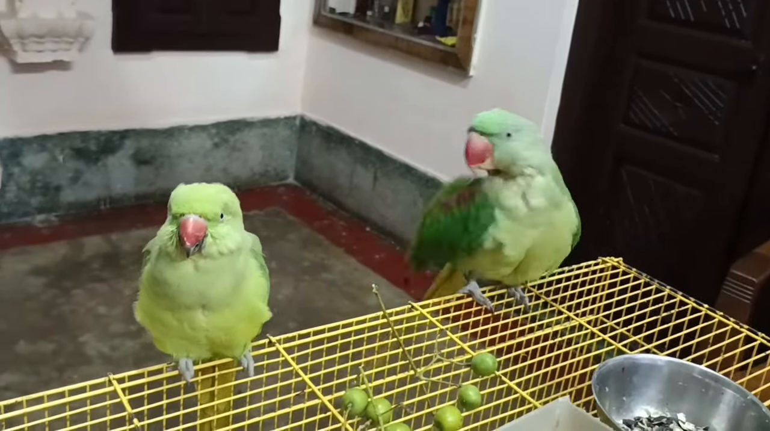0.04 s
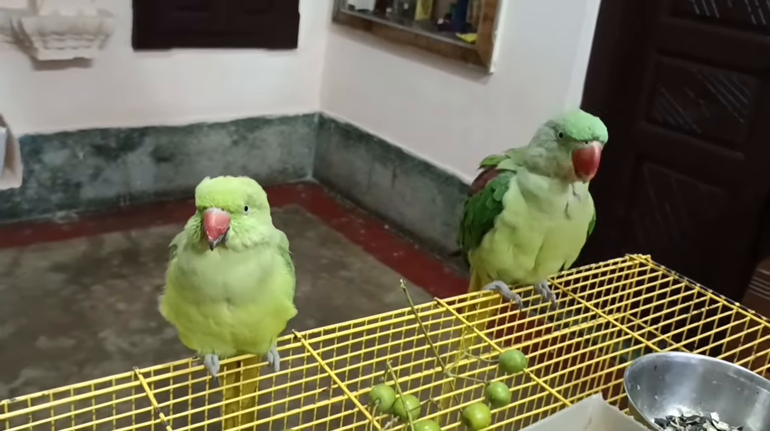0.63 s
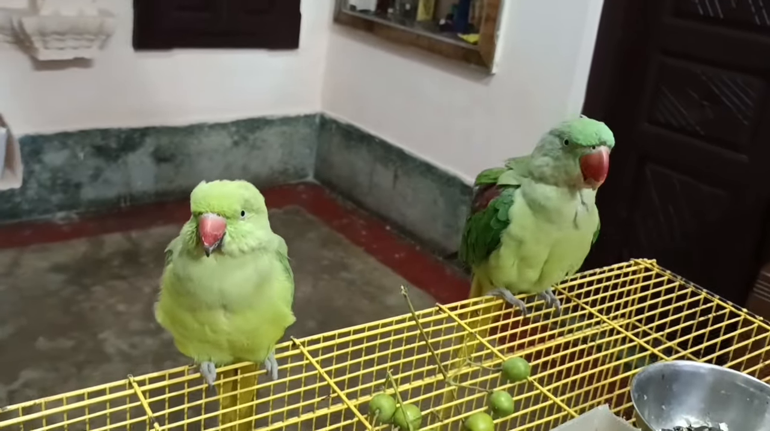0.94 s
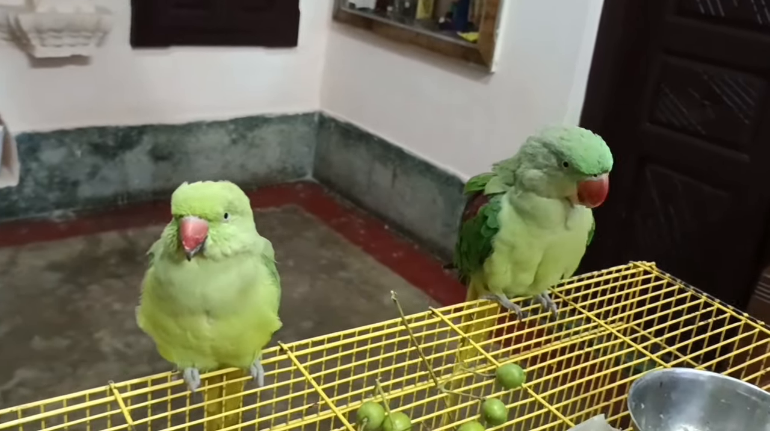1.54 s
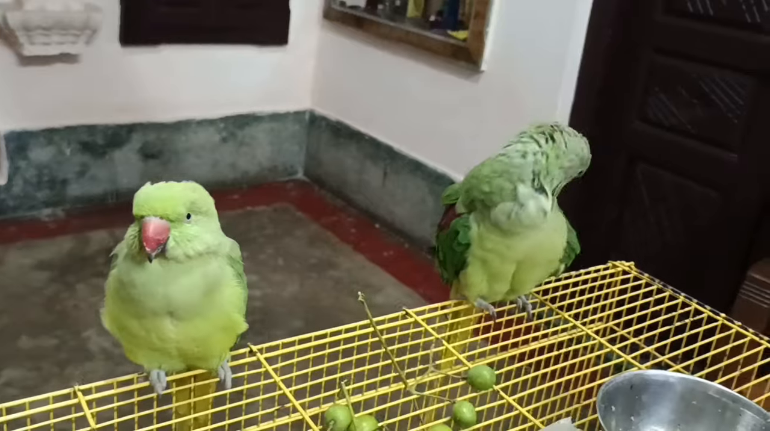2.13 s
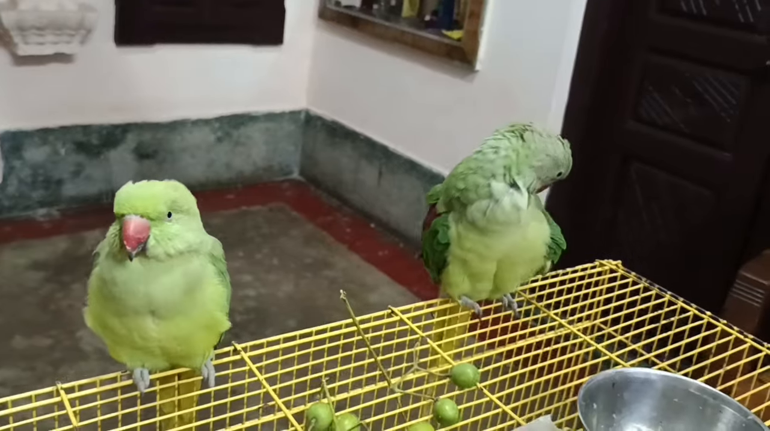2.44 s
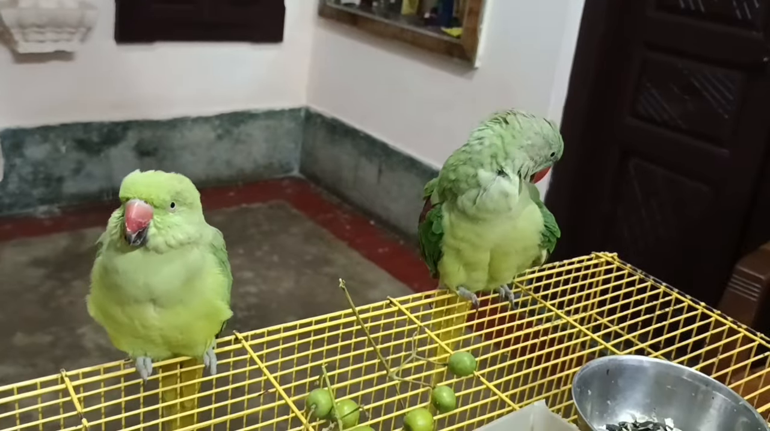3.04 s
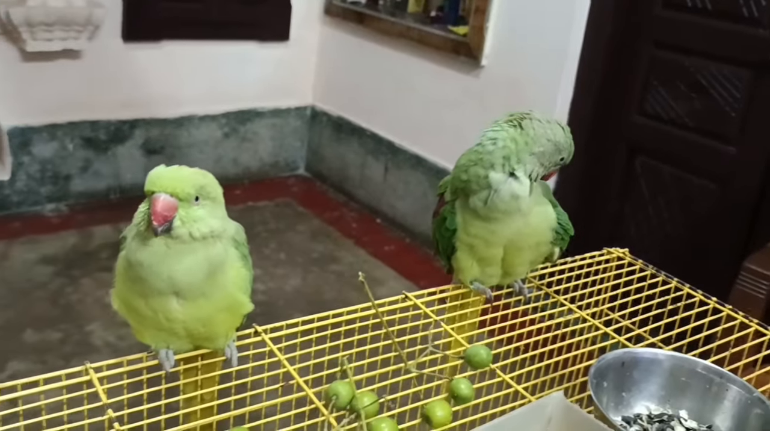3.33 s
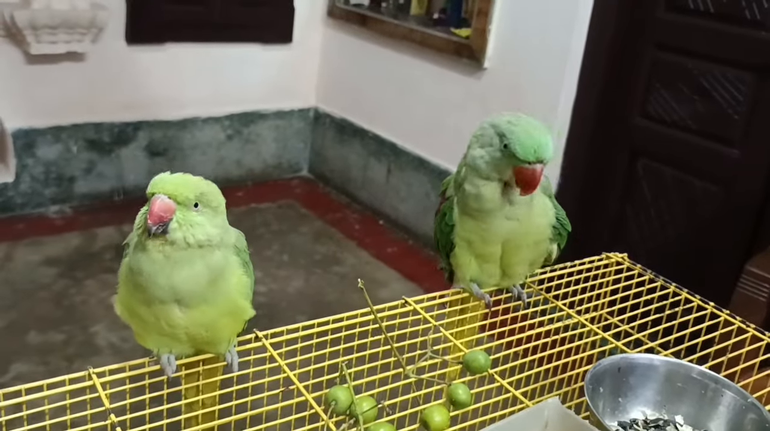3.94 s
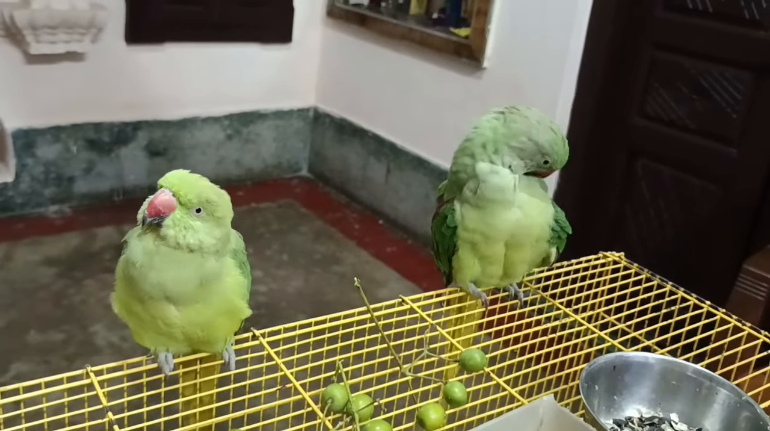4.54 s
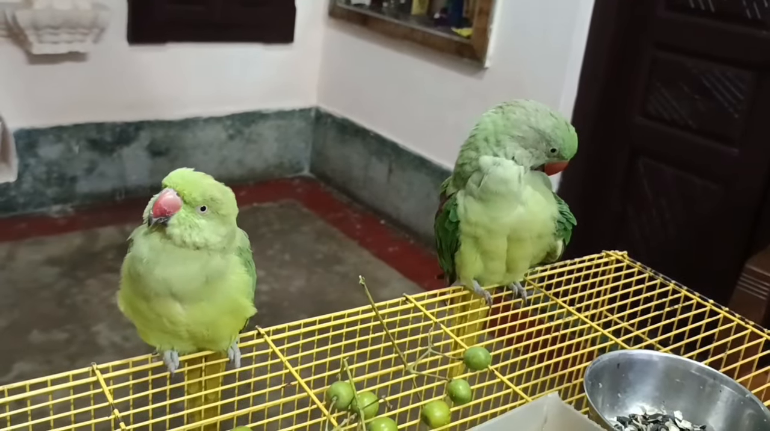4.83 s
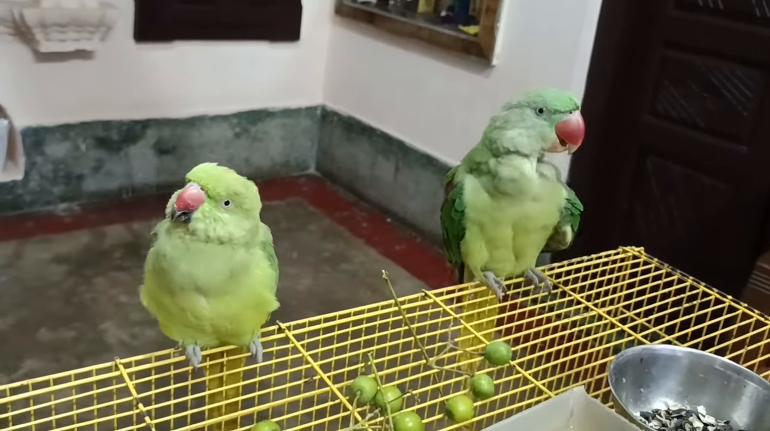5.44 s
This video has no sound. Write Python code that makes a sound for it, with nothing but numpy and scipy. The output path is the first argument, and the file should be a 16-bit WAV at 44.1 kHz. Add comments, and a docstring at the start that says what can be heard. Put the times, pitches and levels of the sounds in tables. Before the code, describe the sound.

Close by in a small, slightly echoing room, a parakeet squeaks once, loudly. Feathers rustle softly over a steady low rumble and hiss. After a brief upward chirp and a few dry beak clicks, the bird runs a hoarse rising chirp, a squawk and a long climbing whistle together, the whistle breaking to a higher note. After a short gap it chirps upward once more.

```python
"""Caged parakeets in a hard-walled room

Two parakeets sit on their wire cage, close to a pair of microphones. One is finishing a high whistle as the
sound begins, then chirps upward, squawks and slides into a long whistle that cracks to a higher note. Each call
is a harmonic stack from the syrinx, swept through the fixed resonances of the throat, plus a rasp of air.
Between calls: faint beak clicks and feather rustles over a low room rumble."""
import sys
import numpy as np
from scipy import signal
from scipy.fft import rfft, irfft
from scipy.io import wavfile

SR = 44100
rng = np.random.default_rng(int(sys.argv[2]) if len(sys.argv) > 2 else 0)


def store_wav(level_fs):
    """Save 16-bit WAV to argv[1]."""
    pcm = np.round(np.clip(np.atleast_2d(level_fs), -1, 1) * 32767)
    wavfile.write(sys.argv[1], SR, pcm.T.astype(np.int16))


N = 250047
BAND_LIMIT_HZ = 15750


def gain_of(db):
    """Decibels to an amplitude factor."""
    return 10 ** (np.asarray(db) / 20)


def unit_rms(x):
    """Scales to an rms of one."""
    return x / np.sqrt(np.mean(x ** 2) + 1e-20)


def log_interp(points, hz):
    """Reads a table on a log-frequency axis."""
    f, value = np.transpose(points)
    return np.interp(np.log(hz + 1), np.log(f + 1), value)


def ramp(x, zero, one):
    """Goes from 0 to 1 between two values of x."""
    return np.clip((x - zero) / (one - zero), 0, 1)


def trace(points):
    """Joins breakpoints with straight lines; returns time, then each column."""
    times, *columns = np.transpose(points)
    t = np.arange(times[0], times[-1], 1 / SR)
    return t, *(np.interp(t, times, column) for column in columns)


def add(mix, start_s, sound):
    """Mixes a sound in at a time."""
    part = mix[max(round(start_s * SR), 0):][:len(sound)]
    part += sound[:len(part)]


def noise(spectrum, size):
    """Coloured noise, rms one."""
    shape = gain_of(log_interp(spectrum, np.fft.rfftfreq(size, 1 / SR)))
    return unit_rms(irfft(rfft(rng.standard_normal(size)) * shape, size))


def flutter(rate_hz, size):
    """Random wavering up to about the given rate, rms one."""
    hz = np.fft.rfftfreq(size, 1 / SR)
    return unit_rms(irfft(rfft(rng.standard_normal(size)) * hz / (1 + (hz / rate_hz) ** 4), size))


# Background stereo image: (frequency [Hz], left-right correlation [-1..1])
AIR_CORRELATION = [(60, 0.92), (130, 0.91), (270, 0.91), (570, 0.59), (1210, -0.11), (2580, -0.075),
                   (5460, -0.01), (11600, -0.099)]
def air(spectrum, level_db):
    """Steady stereo noise, nearly alike on both sides in the bass."""
    hz = np.fft.rfftfreq(N, 1 / SR)
    correlation = log_interp(AIR_CORRELATION, hz)
    shape = gain_of(log_interp(spectrum, hz)) * np.sqrt([1 + correlation, 1 - correlation])
    mid, side = irfft(rfft(rng.standard_normal((2, N))) * shape, N)
    return gain_of(level_db) * np.array([mid + side, mid - side]) / mid.std()


# Background noise spectra: (frequency [Hz], relative density [dB])
RUMBLE_SPECTRUM = [(42, -55), (72, -7), (96, -0.5), (113, -4.5), (156, 0), (247, -8), (291, -3.5),
                   (319, -6), (339, -5), (372, -9), (450, -11), (580, -22), (990, -120)]
HISS_SPECTRUM = [(320, -21), (550, 0), (610, -1.5), (864, -2.5), (1310, -8.5), (1430, -9.5), (1830, -10.5),
                 (2160, -11.5), (3920, -22), (4290, -21.5), (5200, -28), (6560, -25.5), (8170, -32.5),
                 (10300, -26.5), (12000, -34), (15700, -67), (22000, -120)]
FIZZ_SPECTRUM = [(6000, -44), (8500, -30.5), (9700, -12), (10400, -3), (11000, -11), (12000, -20.5),
                 (15500, -16.5)]
def room_tone(sway_db=1.55, sway_hz=4.4, hum_hz=50, hum_db=-67.5):
    """Wavering rumble, broad hiss, faint high fizz and a low hum."""
    rumble = air(RUMBLE_SPECTRUM, level_db=-49) * gain_of(sway_db * flutter(sway_hz, N))
    hiss = air(HISS_SPECTRUM, level_db=-55)
    fizz = air(FIZZ_SPECTRUM, level_db=-74.5)
    hum = gain_of(hum_db) * np.sqrt(2) * np.sin(2 * np.pi * hum_hz * np.arange(N) / SR)
    return rumble + hiss + fizz + hum


# Reflections off nearby walls and floor: (delay [s], left [dB], right [dB])
WALL_ECHOES = [(.0062, -30, -9), (.0135, -14, -12.5), (.0205, -31.5, -12.5), (.0345, -15.5, -43.5)]
# Room decay: (frequency [Hz], T60 [s])
ROOM_DECAY = [(300, 0.66), (1000, 0.47), (2200, 0.43), (4500, 0.43), (7000, .36), (11000, 0.35),
              (16000, .2)]
def reverb(x, tail_db=-10.5, treble_db_per_octave=-0.5, build_s=0.018):
    """A few wall echoes, then a diffuse tail whose treble dies first."""
    taps = rng.choice([-1., 1.], (2, SR)) * (rng.random((2, SR)) < .1)
    hz, t, spectra = signal.stft(taps, SR, nperseg=256)
    tilt_db = treble_db_per_octave * np.log2(np.maximum(hz / 2500, 1))[:, None]
    decay_db = -60 * t / log_interp(ROOM_DECAY, hz)[:, None]
    response = signal.istft(spectra * gain_of(tilt_db + decay_db), SR, nperseg=256)[1][:, :SR]
    response *= 1 - np.exp(-(np.arange(SR) / SR / build_s) ** 2)
    midband_gain = np.sqrt(np.mean(abs(rfft(response)[:, 1000:3000]) ** 2))
    response *= gain_of(tail_db) / midband_gain
    for delay_s, *sides_db in WALL_ECHOES:
        response[[0, 1], int(delay_s * SR) + rng.integers(0, 24, 2)] += gain_of(sides_db)
    return signal.fftconvolve(x[None], response, axes=1)[:, :N]


# Feather movements: (centre [s], half length [s], swish [dB], body [dB])
FEATHER_RUSTLES = [(1.027, 0.05, -65.5, -57), (1.211, 0.038, -74, -70), (1.352, 0.026, -62.5, -50),
                   (1.379, 0.027, -65.5, -59), (1.614, 0.0098, -62.5, -46), (1.636, .03, -62.5, -51),
                   (3.346, 0.066, -66, -54.5), (5.235, 0.092, -70.5, -67)]
# Rustle spectra: (frequency [Hz], relative level [dB])
SWISH_SPECTRUM = [(3000, -24), (5500, -13), (7500, -3), (10500, -13), (15000, -29)]
BODY_SPECTRUM = [(400, -25), (950, 5), (1600, -8), (4000, -25), (8000, -53)]
def feathers():
    """Small movements: a high swish with a dull body."""
    out = np.zeros(N)
    for centre_s, half_s, swish_db, body_db in FEATHER_RUSTLES:
        size = int(2 * half_s * SR)
        swish = gain_of(swish_db) * noise(SWISH_SPECTRUM, size)
        body = gain_of(body_db) * noise(BODY_SPECTRUM, size)
        add(out, centre_s - half_s, np.hanning(size) * (swish + body))
    return out


# Beak clicks: (time [s], level [dB], centre [Hz])
BEAK_CLICKS = [(3.309, -54, 9800), (3.317, -50, 10300), (3.341, -49, 9400), (3.351, -45.5, 6600),
               (3.365, -49, 6100)]
def beak(ring_s=0.0014, spread=0.12, tick_count=10, tick_db=-57, tick_hz=9800):
    """The edges of the beak slip over each other: tiny dry clicks among fainter ticks."""
    out, t = np.zeros(N), np.arange(512) / SR
    envelope = t / ring_s * np.exp(1 - t / ring_s)
    ticks = [(time_s, tick_db, tick_hz) for time_s in rng.uniform(3.29, 3.352, tick_count)]
    # (log-frequency offset [spreads], relative level [dB])
    band = [(-14, -50), (-2, -26), (0.5, -9), (0, 3), (0, -14), (2, -34), (7, -50)]
    for time_s, level_db, centre_hz in BEAK_CLICKS + ticks:
        spectrum = [(centre_hz * np.exp(offset * spread), db) for offset, db in band]
        add(out, time_s - ring_s, gain_of(level_db) * noise(spectrum, len(t)) * envelope)
    return out


# Resonances of windpipe and open beak: (frequency [Hz], gain [dB])
THROAT_RESPONSE = [(600, 0.5), (1000, 0), (1600, 1), (2200, 10), (3000, 2), (3600, -10.5), (4300, -6),
                   (5200, -9), (6800, -4.5), (8400, -15.5), (9600, -5), (11300, 4.5), (12200, -2),
                   (13000, -19.5), (15500, -22)]
# Air rasp in a rough call: (frequency [Hz], relative level [dB])
RASP_SPECTRUM = [(600, -36), (1500, -18), (2200, 0), (2800, -2), (3500, -22), (5500, -38), (8500, -48),
                 (10500, -26), (12000, -33), (13500, -54), (15500, -62)]
def syrinx(t, pitch_hz, effort_db, even_db, bright_db, rough, register, *, jitter, shimmer, rasp_db,
           notch_db, top_db, notch_hz=5800, top_hz=10300, quiver_hz=260, waver=0.0091, waver_hz=45,
           uneven_db=4, edge_s=0.0012):
    """One call on a full-length track: a harmonic stack swept through the throat's fixed resonances."""
    size, rough = len(t), np.clip(rough, 0, 1)
    # Unsteady membranes shake pitch and strength.
    wobble = jitter * rough * flutter(quiver_hz, size)
    wobble += waver * np.sqrt(rough) * flutter(waver_hz, size)
    phase = 2 * np.pi * np.cumsum(pitch_hz * (1 + wobble)) / SR
    shake = np.exp(shimmer * rough * flutter(quiver_hz, size))
    k = np.arange(1, 19)[:, None]
    # A symmetric swing loses even harmonics; a harder closure lifts the upper ones.
    source_db = log_interp(register, k) + even_db * (k % 2 == 0) / np.sqrt(k / 2) + bright_db * (k > 2)
    hoarse_db = uneven_db * np.sqrt(rough * np.log(k)) * np.array([flutter(waver_hz, size) for _ in k])
    # A half-closed beak notches the treble and reweights the top resonance.
    hz = k * pitch_hz
    throat_db = log_interp(THROAT_RESPONSE, hz) + notch_db * np.exp(-((hz - notch_hz) / 1200) ** 2)
    throat_db += top_db * np.exp(-((hz - top_hz) / 1400) ** 2)
    amplitudes = gain_of(source_db + hoarse_db + throat_db) * (hz < BAND_LIMIT_HZ)
    tone = np.sqrt(2) * (amplitudes * np.cos(k * phase)).sum(0)
    puffs = unit_rms(1 + .5 * np.cos(phase))  # air escapes once a cycle
    rasp = gain_of(rasp_db) * rough * noise(RASP_SPECTRUM, size) * puffs
    envelope = gain_of(effort_db) * signal.windows.tukey(size, 2 * edge_s * SR / size)
    out = np.zeros(N)
    add(out, t[0], envelope * (tone * shake + rasp))
    return out


# Syrinx spectrum, chirping: (harmonic [number], level [dB])
CHIRP_REGISTER = [(1, 0), (2, -1), (3, 2), (4, -8.5), (5, -12.5), (6, -16), (7, -43), (8, -29.5),
                  (10, -21.5), (13, -33), (15, -28.5), (18, -42)]
# Rising chirps: (start [s], end [s], steepest point [s], sweep time [s], low [Hz], top [Hz],
# effort [dB], brightness [dB], roughness [0..1], rasp [dB], beak notch [dB], top resonance [dB])
RISING_CHIRPS = [(2.705, 2.776, 2.752, .011, 729, 1107, -32, 2.5, .42, -8, -32, 11),
                 (3.472, 3.689, 3.563, .046, 630.4, 1402, -34.5, -1.5, 0.48, 0.5, 5.5, -0.5),
                 (5.426, 5.658, 5.479, .038, 606.4, 1437, -30.5, 0, 0.36, 2.5, -11, 11)]
def chirps(attack_s=0.039, release_share=0.15, swell_db=8, fade_db=-15.5, dull_db=-27, droop=.05,
           hollow_hz=1330, reedy_hz=1200):
    """Pitch and effort climb an S-curve; hoarse in mid-sweep and at the end, hollow when high."""
    out = np.zeros(N)
    for (start_s, end_s, steepest_s, sweep_s, low_hz, high_hz,
         effort_db, bright_db, rough, rasp_db, notch_db, top_db) in RISING_CHIRPS:
        t = np.arange(start_s, end_s, 1 / SR)
        climb = (1 + np.sin(np.arctan((t - steepest_s) / sweep_s))) / 2
        sweeping = 1 - (2 * climb - 1) ** 2
        pitch_hz = low_hz + (high_hz - low_hz) * climb
        opening = ramp(t - start_s, attack_s, 0)
        closing = ramp(t, end_s - release_share * (end_s - start_s), end_s)
        hollow = (1 + np.tanh((pitch_hz - hollow_hz) / 84)) / 2
        reedy = np.exp(-((pitch_hz - reedy_hz) / 160) ** 2)  # second harmonic takes over
        effort_db += swell_db * (climb - 1) + 1.5 * hollow + fade_db * (opening + closing ** 3)
        even_db = 1.6 - 0.5 * reedy - 22 * hollow * (1 - closing ** 3)
        bright_db += 7.5 * hollow - 6 * reedy - sweeping + dull_db * (opening + closing * hollow)
        rough *= 0.36 * (1 - hollow) + 0.64 * np.sqrt(2 * sweeping * climb) + 0.8 * closing ** 2
        pitch_hz *= 1 - droop * closing ** 4
        out += syrinx(t, pitch_hz, effort_db, even_db, bright_db, rough, CHIRP_REGISTER,
                      jitter=.018, shimmer=.28, rasp_db=rasp_db, notch_db=notch_db, notch_hz=6260,
                      top_db=top_db, waver=0.0032, uneven_db=2.5)
    return out


# Syrinx spectrum, squawking: (harmonic [number], level [dB])
SQUAWK_REGISTER = [(1, 0.5), (2, -3), (3, -2.5), (4, -9.5), (5, -8.5), (6, -14), (7, -15), (9, -23),
                   (11, -24), (14, -7), (18, -30)]
# Squawk contour: (time [s], pitch [Hz], effort [dB])
SQUAWK_CONTOUR = [(3.731, 993, -32.5), (3.747, 1024, -28), (3.757, 1098, -26.5), (3.772, 1109, -28),
                  (3.797, 1033, -25.5), (3.832, 963, -27), (3.852, 962, -40.5), (3.885, 927, -42)]
def squawk(slack_hz=930, taut_hz=1030, even_db=0.4):
    """A pitch arch: bright and clear on top, dull and rough as the tension drops."""
    t, pitch_hz, effort_db = trace(SQUAWK_CONTOUR)
    taut = ramp(pitch_hz, slack_hz, taut_hz)
    bright_db = -17 + 18 * taut
    rough = 0.62 - 0.52 * taut ** 2
    return syrinx(t, pitch_hz, effort_db, even_db, bright_db, rough, SQUAWK_REGISTER,
                  jitter=0.023, shimmer=0.12, rasp_db=-8.5, notch_db=5.5, top_db=-5)


def burst_gesture(start_s, length_s, from_hz, to_hz, effort_db, even_db, bright_db,
                  rough_ends, rough_middle, attack_s, release_s, edge_db=-20):
    """Syrinx controls for a brief note that snaps on, bends in pitch and snaps off."""
    t = np.arange(0, length_s, 1 / SR)
    progress = t / length_s
    edges = ramp(t, attack_s, 0) + ramp(t, length_s - release_s, length_s)
    pitch_hz = from_hz + (to_hz - from_hz) * progress ** 2
    rough = rough_ends + (rough_middle - rough_ends) * np.sin(np.pi * progress)
    return start_s + t, pitch_hz, effort_db + edge_db * edges, even_db, bright_db, rough


# Barks: (start [s], length [s], from [Hz], to [Hz], effort [dB], even harmonics [dB], brightness [dB])
BARK_NOTES = [(3.709, .014, 1066, 995, -29.5, 0, 6.5), (5.656, 0.018, 1400, 1330, -35.5, -4, -3)]
def barks():
    """Short, harsh falling notes, roughest in the middle."""
    out = np.zeros(N)
    for note in BARK_NOTES:
        gesture = burst_gesture(*note, rough_ends=.63, rough_middle=.95, attack_s=.0025, release_s=.0044)
        out += syrinx(*gesture, SQUAWK_REGISTER, jitter=0.039, shimmer=.12, rasp_db=-8,
                      notch_db=-2, top_db=-13)
    return out


# Cracks: (start [s], length [s], from [Hz], to [Hz], effort [dB], even harmonics [dB], brightness [dB])
CRACK_NOTES = [(0.051, .057, 2201, 2277, -22, 0.5, -5.5), (4.361, .043, 2299, 2436, -24.5, 8, -6.5)]
def cracks():
    """The brief higher note that each whistle breaks into."""
    out = np.zeros(N)
    for note in CRACK_NOTES:
        gesture = burst_gesture(*note, rough_ends=.48, rough_middle=.45, attack_s=.0045, release_s=.005)
        out += syrinx(*gesture, WHISTLE_REGISTER, jitter=.026, shimmer=0.032, rasp_db=-39,
                      notch_db=-5, notch_hz=6800, top_db=0.5, quiver_hz=190)
    return out


def whistle_gesture(contour, loose_hz=1040, tight_hz=1420, hollow_hz=1400, shrill_hz=1600,
                    full_hz=1700, held_hz=1950, release_s=0.025):
    """Syrinx controls: clearer and fuller with pitch, shrillest part way up, overtones fading last."""
    t, pitch_hz, effort_db = trace(contour)
    tight = ramp(pitch_hz, loose_hz, tight_hz)
    shrill = np.exp(-((pitch_hz - shrill_hz) / 140) ** 2)
    fade_db = -13 * ramp(t, t[-1] - release_s, t[-1])
    even_db = -11 + 15 * ramp(pitch_hz, hollow_hz, full_hz) + fade_db
    bright_db = -15 + 12 * tight + 11 * shrill + fade_db
    rough = (1 - 0.85 * tight) * (1 - 0.36 * ramp(pitch_hz, full_hz, held_hz) ** 4)
    return t, pitch_hz, effort_db, even_db, bright_db, rough


# Syrinx spectrum, whistling: (harmonic [number], level [dB])
WHISTLE_REGISTER = [(1, -1), (2, -13), (3, -10.5), (4, -21), (5, -21.5), (6, -21), (7, -23), (8, -25.5),
                    (10, -19), (14, -38), (18, -69)]
# Whistle contours: (time [s], pitch [Hz], effort [dB])
HELD_END_CONTOUR = [(0, 1968, -11.5), (.022, 1970, -21), (.046, 1912, -16), (.057, 1987, -26.5)]
SLIDE_CONTOUR = [(3.885, 912, -43.5), (3.96, 1110, -36), (4.04, 1285, -32.5), (4.057, 1402, -28.5),
                 (4.11, 1475, -24), (4.167, 1655, -35), (4.173, 1697, -23), (4.238, 1941, -18.5),
                 (4.295, 1952, -19.5), (4.338, 1949, -20), (4.361, 2062, -32)]
def whistles():
    """The end of a high held whistle, already sounding at the start, and a long whistle that slides up and
    holds."""
    squeak = syrinx(*whistle_gesture(HELD_END_CONTOUR), WHISTLE_REGISTER, jitter=.008, shimmer=0.045,
                    rasp_db=-30.5, notch_db=-7.5, notch_hz=7840, top_db=7, waver=0.0018)
    slide = syrinx(*whistle_gesture(SLIDE_CONTOUR), WHISTLE_REGISTER, jitter=0.03, shimmer=0.22,
                   rasp_db=-38, notch_db=0.5, top_db=2, waver=0.0048)
    return squeak + slide


# Phase between microphones: (frequency [Hz], left lead [rad])
MIC_LEAD = [(0, 0), (950, 0.76), (1400, 1.48), (1950, 3.5), (2400, 5), (3100, 4), (4300, 9), (6000, 13),
            (9500, 17), (11500, 20.5), (16000, 27.5)]
# Level between microphones: (frequency [Hz], left minus right [dB])
MIC_BALANCE = [(600, -0.5), (1100, -4), (1950, -7), (2800, -1), (3600, 5), (4300, 8), (5800, -2.5),
               (7200, 2.5), (10000, 2.5), (11700, 8.5)]
def microphones(x):
    """The left microphone is reached first, and the housing shades each one differently."""
    hz = np.fft.rfftfreq(2 * N, 1 / SR)
    lead_rad = np.interp(hz, *np.transpose(MIC_LEAD))
    left = gain_of(log_interp(MIC_BALANCE, hz) / 2) * np.exp(.5j * lead_rad)
    return irfft(rfft(x, 2 * N) * np.array([left, 1 / left]))[:, :N]


def scene():
    """Birds close by, the room behind them."""
    voice = chirps() + squawk() + whistles() + cracks() + barks()
    fidgets = beak() + feathers()
    slightly_left = gain_of([[1], [-1]])
    return room_tone() + reverb(voice + fidgets) + fidgets * slightly_left + microphones(voice)


def record(dry):
    """Low-pass at the band limit."""
    lowpass = signal.firwin(511, BAND_LIMIT_HZ, window=("kaiser", 9), fs=SR)
    return signal.oaconvolve(dry, lowpass[None], "same")


dry = scene()
out = record(dry)
store_wav(out)
```